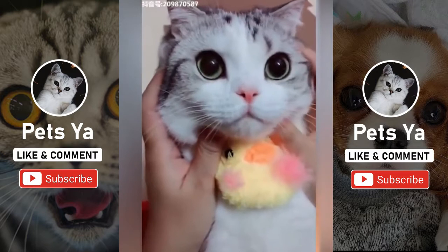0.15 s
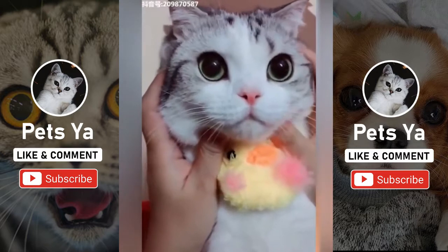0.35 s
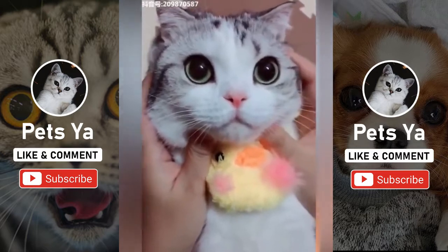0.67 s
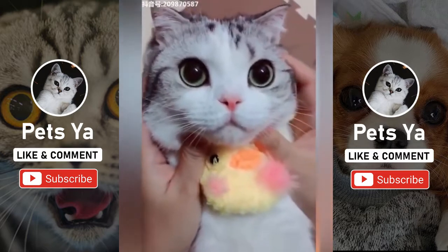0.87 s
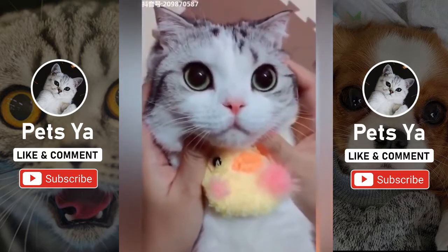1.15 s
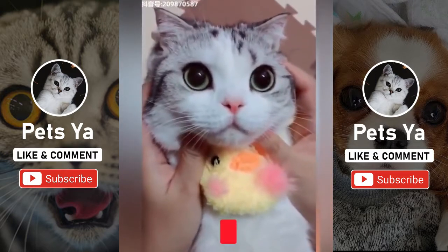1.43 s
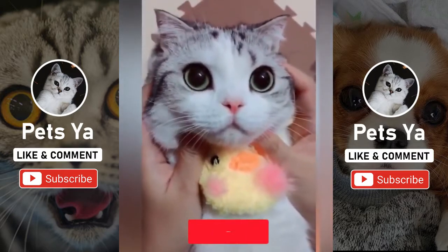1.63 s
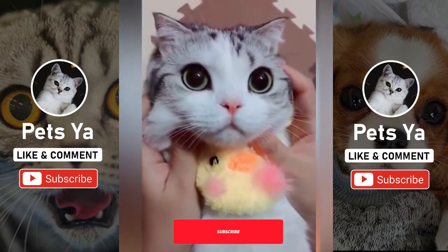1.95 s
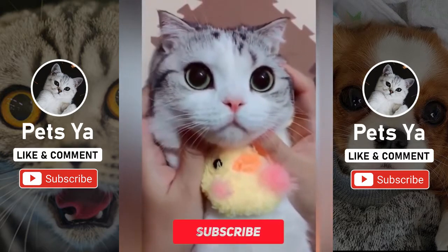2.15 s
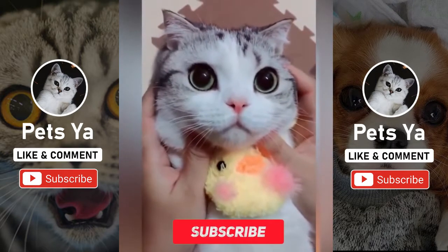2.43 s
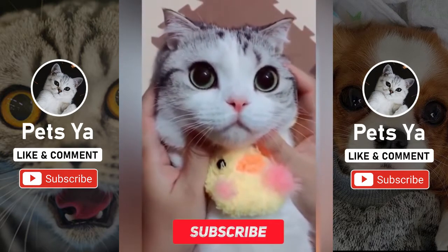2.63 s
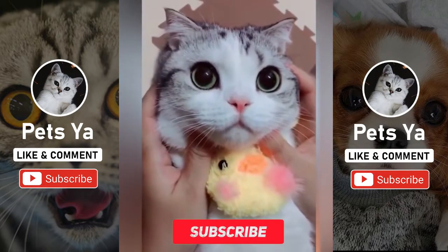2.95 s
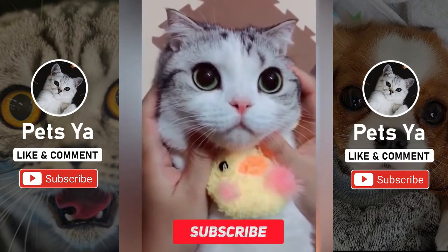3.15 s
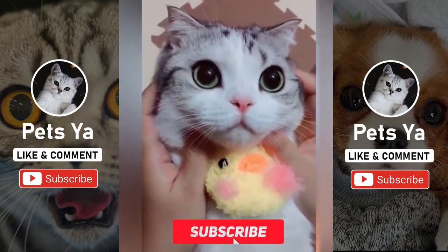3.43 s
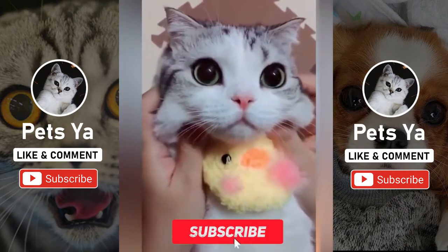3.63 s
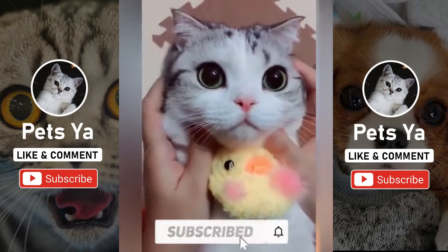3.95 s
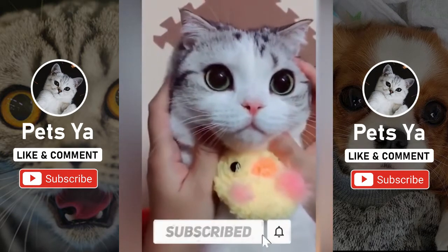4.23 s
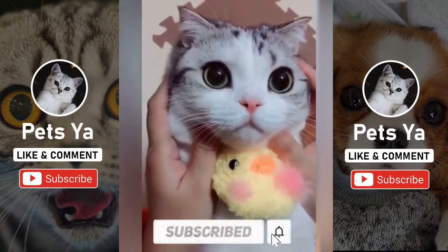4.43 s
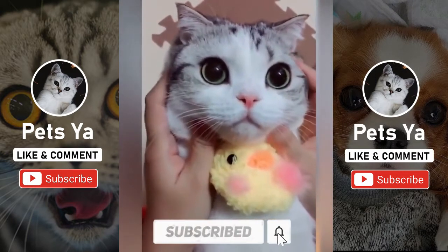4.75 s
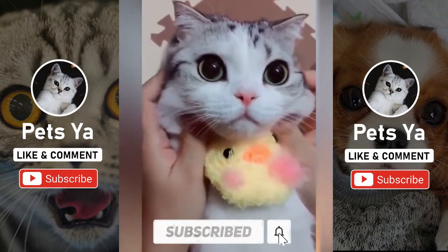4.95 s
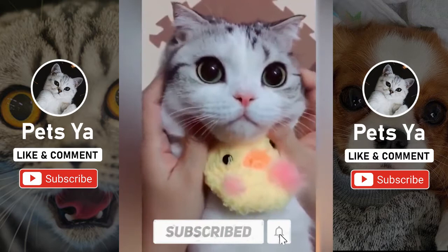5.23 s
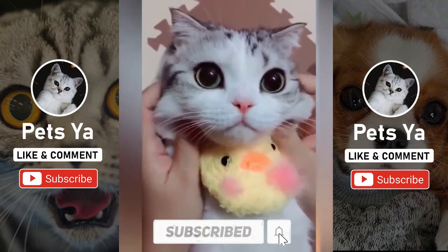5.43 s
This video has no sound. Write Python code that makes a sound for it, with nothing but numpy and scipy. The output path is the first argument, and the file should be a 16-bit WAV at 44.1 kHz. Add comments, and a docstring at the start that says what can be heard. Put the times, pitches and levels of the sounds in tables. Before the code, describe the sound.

A plush toy gives five short, high squeezed squeaks, with faint rubbing of hands on fur in a quiet room.

```python
"""A plush toy is squeezed five times against a kitten, close to a phone in a small quiet room.
At 0 s a plastic reed squeaks in an arch as air is pressed out, then again as it is sucked back.
Hands bump and rub on fur and plush, the plastic ticks, and a second squeeze follows at 2.2 s.
At 4 s comes a third, with two reeds on the intake; then more stroking.
Two quick squeezes at 5.1 and 5.4 s close the scene, the last drawing air through three reeds at once."""
import sys
import numpy as np
from scipy import signal
from scipy.fft import rfft, irfft, next_fast_len
from scipy.io import wavfile
from scipy.ndimage import uniform_filter1d, minimum_filter1d, map_coordinates

SR = 44100
rng = np.random.default_rng(int(sys.argv[2]) if len(sys.argv) > 2 else 0)


def persist_wave(psi):
    """Save psi, clipped to +-1, as 16-bit WAV."""
    counts = np.round(np.clip(psi, -1, 1) * 32767).astype(np.int16)
    wavfile.write(sys.argv[1], SR, np.atleast_2d(counts).T)


N = 246544

# Reed and pipe colours, one for each way of blowing: freq_hz, gain_db
MUFFLED = [(600, -29.5), (1150, -17), (2300, -13), (3500, -6), (4900, -0.5), (6000, -7), (7700, -6.5),
           (8700, -21), (9800, -39), (11700, -25), (13500, -44)]
BRIGHT = [(600, -26), (1450, -11), (2900, -5), (4500, -3.5), (5500, -6), (6600, -16.5), (8000, -9.5),
          (9700, -4), (10400, -11), (11000, -16.5), (12600, -23), (14000, -32), (15500, -48)]
RINGING = [(600, -30.5), (1400, -6.5), (2820, -2.5), (4230, 0), (5600, 0), (7050, -8.5), (8400, -14),
           (9500, -3.5), (10000, 0.5), (11280, -15), (12600, -28), (14100, -24.5), (15500, -34)]
HARD = [(600, -27.5), (1500, -15), (3100, -5.5), (4200, -6.5), (5400, 0), (6600, -10.5), (8300, -14.5),
        (10000, -16.5), (12000, -30.5), (15500, -46.5)]
SHRILL = [(600, -23), (1450, -9.5), (2900, -5), (4400, -1), (5900, -19), (7400, -26.5), (8900, -14),
          (10300, -10), (11300, -5), (12000, -31), (13200, -21), (14300, -31), (15500, -40.5)]
INWARD = [(600, -13.5), (1280, -9.5), (2600, -5), (3900, -3), (5100, -9.5), (6300, -18), (7500, -33),
          (8900, -14), (10200, -10.5), (11300, -11), (12700, -17.5), (14200, -37), (15500, -28.5)]
MELLOW = [(600, -23), (1150, -4.5), (2300, -2), (3450, 4), (4600, -20.5), (5800, -29.5), (7500, -37.5),
          (9300, -27), (10800, -23), (12500, -30.5), (15500, -42)]
HOLLOW = [(600, -16), (1150, 1), (2350, 5), (3500, 6.5), (4700, -3), (7500, -39), (10500, -16),
          (15500, -42)]
# Air leaking through a reed: freq_hz, density_db
LEAK = [(300, -27.5), (950, -20.5), (1300, 0), (1700, -14), (2400, -8.5), (3300, -2), (5200, -0.5),
        (7000, -3.5), (8500, -7), (10500, -12.5), (12500, -17.5), (15500, -31.5)]
# Turbulent air in a reed: freq_hz, density_db
TURBULENCE = [(200, -24), (700, -13.5), (1400, -11.5), (3000, -10), (5000, -12.5), (7000, -3.5),
              (8700, -3.5), (10500, -9), (13000, -6), (15500, -19.5)]
# Plastic tick or fabric scratch: freq_hz, gain_db
TICK = [(300, -19), (1500, -6), (2700, -7.5), (3900, -1.5), (5200, -15), (8000, -27.5), (15000, -33.5)]


def amp(db):
    """Decibels to gain."""
    return 10 ** (np.asarray(db) / 20)


def unit(x):
    """Scale to rms 1."""
    return x / np.sqrt(np.mean(x ** 2) + 1e-20)


def along(points, hz):
    """Interpolate (freq_hz, value) points on a log axis."""
    freq_hz, values = np.transpose(points)
    return np.interp(np.log(hz + 1), np.log(freq_hz), values)


def wobble(rate_hz, size):
    """Smooth random curve, rate_hz knots a second."""
    knots = rng.standard_normal(int(size * rate_hz / SR) + 4)
    return map_coordinates(knots, [np.arange(size) * rate_hz / SR])


def coloured(x, points, size=4096):
    """Minimum-phase filter through (freq_hz, gain_db) points."""
    cepstrum = irfft(np.log(amp(along(points, np.fft.rfftfreq(size, 1 / SR)))))
    fold = 1 + np.sign(size / 2 - np.arange(size))
    fold[0] = 1
    return signal.fftconvolve(x, irfft(np.exp(rfft(cepstrum * fold))))[:len(x)]


def noise(points):
    """Noise of rms 1 with the given spectrum."""
    shape = amp(along(points, np.fft.rfftfreq(N, 1 / SR)))
    return unit(irfft(rfft(rng.standard_normal(N)) * shape, N))


def add(track, start_s, x):
    """Mix x into the track at start_s."""
    start = min(round(start_s * SR), N)
    x = x[max(-start, 0):N - start]
    track[max(start, 0):max(start, 0) + len(x)] += x


def rumble(level_db=-62.5):
    """Faint, wavering low noise."""
    # Rumble spectrum: freq_hz, density_db
    spectrum = [(8.8, -34), (15, 1), (102, -2.5), (145, -10.5), (196, -6), (219, -17), (300, -14),
                (390, -45.5), (660, -120)]
    return amp(level_db + 2.0 * wobble(1.8, N) + 3.0 * wobble(24, N)) * noise(spectrum)


def room(x, early_db=-27, tail_db=-29, early_t60_s=.13):
    """Near surfaces answer at once; the tail dies fastest in the treble."""
    # Room decay: freq_hz, t60_s
    decay = [(300, .28), (1300, 0.35), (4000, 0.3), (8000, 0.19), (15000, 0.057)]
    hz, t, spectra = signal.stft(rng.standard_normal(SR // 2), SR, nperseg=256)
    tail = signal.istft(spectra * amp(-60 * t / along(decay, hz)[:, None]), SR, nperseg=256)[1]
    early = rng.standard_normal(len(tail)) * amp(-60 * np.arange(len(tail)) / SR / early_t60_s)
    response = amp(tail_db) * tail / np.linalg.norm(tail) + amp(early_db) * early / np.linalg.norm(early)
    return signal.fftconvolve(x, np.pad(response, (SR // 300, 0)))[:N]


def handling(rub_gain_db=-0.5, hold_db=-67, fur_db=-71):
    """Fingers rub the plush and catch on its pile; the hands never quite rest, so the fur hisses on."""
    # Finger strokes: centre_s, half_length_s, rub_db, pile_db
    strokes = [(1.442, 0.098, -64, -54), (1.543, 0.12, -57, -72), (2.511, .18, -53, -79.5),
               (4.762, 0.16, -47.5, -58.5), (5.028, 0.11, -48, -62.5)]
    # Dull rubbing: freq_hz, density_db
    rub = [(35, -42), (60, -19.5), (113, 1), (151, -1.5), (284, -4.5), (526, -13), (656, -23.5),
           (1700, -43.5), (2000, -38), (2600, -66.5), (4400, -120)]
    # Catching on the pile: freq_hz, density_db
    pile = [(100, -23.5), (250, 4.5), (480, -6.5), (750, -7), (1200, -42.5), (3000, -35.5), (8000, -58.5)]
    # Fur hiss: freq_hz, density_db
    fur = [(350, -32), (600, -8.5), (660, -14), (832, -13), (915, -10.5), (1660, -20.5), (3470, -22.5),
           (10700, -40.5), (15500, -60)]
    t = np.arange(N) / SR
    centre_s, half_length_s, rub_db, pile_db = np.transpose(strokes)
    force = np.exp(-((t - centre_s[:, None]) / half_length_s[:, None]) ** 2)
    rubbing = (amp(hold_db) + amp(rub_db) @ force) * amp(rub_gain_db + 1.6 * wobble(32, N)) * noise(rub)
    catching = amp(pile_db) @ force * amp(3.2 * wobble(50, N)) * noise(pile)
    unsteady_db = 1.1 * wobble(25, N) + .8 * wobble(2, N)
    return rubbing + catching + amp(fur_db + unsteady_db) * noise(fur)


def bumps(floor_hz=52, scratch_db=-25):
    """Soft hand bumps fall in pitch, each with a scratch of fabric."""
    # Bumps: start_s, level_db, sweep_hz, glide_s, length_s
    hits = [(0.622, -42.5, 1170, 0.0054, 0.032), (0.693, -40, 550, 0.0046, 0.037),
            (5.275, -41, 213, 0.0087, 0.029)]
    out = np.zeros(N)
    for start_s, level_db, sweep_hz, glide_s, length_s in hits:
        t = np.arange(0, length_s, 1 / SR)
        hz = floor_hz + sweep_hz * np.exp(-t / glide_s)
        thud = np.sin(2 * np.pi * np.cumsum(hz) / SR)
        scratch = amp(scratch_db) * unit(coloured(rng.standard_normal(len(t)), TICK))
        envelope = np.sqrt(np.abs(np.sin(np.pi * t / length_s)))
        add(out, start_s, amp(level_db) * envelope * (thud + scratch))
    return out


def clicks(rows, colour, t60_s, gain_db):
    """Plastic cracks: one short noise burst a row."""
    out, t = np.zeros(N), np.arange(SR // 20) / SR
    for start_s, level_db in rows:
        crack = coloured(rng.standard_normal(len(t)) * amp(-60 * t / t60_s), colour)
        add(out, start_s, amp(level_db + gain_db) * crack / np.abs(crack).max())
    return out


def plastic_ticks():
    """The toy's plastic ticks between squeezes."""
    # Ticks: start_s, relative_db
    ticks = [(0.7906, -42), (0.9175, -43.5), (0.965, -37), (1.9294, -52.5), (3.1168, -45), (3.8889, -33),
             (3.9585, -40.5)]
    return clicks(ticks, TICK, t60_s=0.01038, gain_db=-12)


def leak(times_s, level_db, rise_s, decay_s):
    """Air hisses through a reed as it starts or stalls."""
    t = np.arange(N) / SR
    flow = sum(np.exp(-np.where(t < s, ((s - t) / rise_s) ** 2, (t - s) / decay_s)) for s in times_s)
    return amp(level_db) * flow * noise(LEAK)


def arch(length_s, rise_s, start_hz, crest_hz, end_hz, fall_power, crest_db, swell_db, fade_db):
    """Pressure climbs to a crest and gives way; pitch and level follow."""
    t = np.arange(0, length_s, 1 / SR)
    shortfall = np.clip(1 - t / rise_s, 0, 1) ** 1.7
    fall = np.clip((t - rise_s) / (length_s - rise_s), 0, 1)
    pitch_hz = crest_hz - (crest_hz - start_hz) * shortfall - (crest_hz - end_hz) * fall ** fall_power
    return t, pitch_hz, crest_db - swell_db * shortfall - fade_db * fall ** 2


def reed(curve, colour, jitter, hiss, air_db, attack_s, release_s, sag_per_s, rasp_db, flutter_db):
    """A reed chops air into one turbulent puff a cycle, coloured by its pipe. Returns offset_s, sound."""
    # Side note colour: freq_hz, gain_db
    side_colour = [(600, -26.5), (2200, -0.5), (4400, -15.5), (15500, -45)]
    scoop, spread_rad = .08, 0.39
    closing_db, shimmer_db, flicker_db = -27, 0.61, 3.6
    pipe_hz, undertone_db = 3905, -41
    split_hz, split_width_hz, split_ratio, split_db = 1680, 50, 1.24, -21.5
    times_s, pitch_hz, level_db = curve
    t = np.arange(-attack_s, times_s[-1] + 4 * release_s, 1 / SR)
    stalled_s = np.maximum(t - times_s[-1], 0)
    flow = amp(np.interp(t, times_s, level_db) + flutter_db * wobble(73, len(t)))
    flow *= np.clip((t - t[0]) / attack_s, 0, 1) ** 2 * np.exp(-(stalled_s / release_s) ** 1.5)
    # Starts flat, sags as the pressure runs out.
    hz = uniform_filter1d(np.interp(t, times_s, pitch_hz), size=400) * np.exp(-sag_per_s * stalled_s)
    hz *= 1 - scoop * np.exp(-((t - t[0]) / attack_s) ** 2)
    hz *= 1 + jitter * wobble(600, len(t))
    phase = 2 * np.pi * np.cumsum(hz) / SR
    # Weak flow no longer closes the reed: overtones drop out.
    k = np.arange(1, 14)[:, None]
    closing = flow / (flow + amp(closing_db))
    drift = np.array([wobble(45, len(t)) + .5 * wobble(300, len(t)) for _ in k])
    harmonics = closing ** (k / 4) * amp(shimmer_db * k * drift) * (k * hz < SR / 2)
    puffs = coloured((harmonics * np.cos(k * phase - spread_rad * k ** 2)).sum(0), colour)
    tone = puffs / np.sqrt(np.abs(uniform_filter1d(puffs ** 2, size=200)) + 1e-9)
    opening = 1 + .7 * np.cos(phase)
    air = unit(coloured(rng.standard_normal(len(t)) * opening, hiss))
    rasp = unit(coloured(coloured(rng.standard_normal(len(t)) * opening, TURBULENCE), colour))
    rush = (amp(air_db) * air + amp(rasp_db) * rasp) * amp(flicker_db * wobble(37, len(t)))
    # Harmonic 3 beats against the pipe's own note.
    undertone = np.sin(3 * phase - 2 * np.pi * pipe_hz * t) * np.clip((3 * hz - pipe_hz) / 500, 0, 1)
    # Blown hardest, the tone splits off a side note.
    split = (1 + np.tanh((hz - split_hz) / split_width_hz)) / 2
    side_phase = split_ratio * phase
    side = split * unit(coloured(np.sin(side_phase) + np.sin(2 * side_phase), side_colour))
    return t[0], flow * (tone + rush + amp(undertone_db) * undertone + amp(split_db) * side)


def squeaks(rows, hiss, snap_db, snap_lead_s=0.00063, **blowing):
    """Each reed snaps into motion, then follows its arch of pressure."""
    out, snaps = np.zeros(N), []
    for start_s, *shape, colour, jitter, air_db in rows:
        times_s, pitch_hz, level_db = arch(*shape)
        offset_s, sound = reed((times_s, pitch_hz, level_db), colour, jitter, hiss, air_db, **blowing)
        add(out, start_s + offset_s, sound)
        snaps.append((start_s - snap_lead_s, level_db[0]))
    return out + clicks(snaps, HARD, t60_s=0.006, gain_db=snap_db)


def drawing():
    """The toy refills: a faint hiss, then squeaks that droop as they die."""
    # Air in, one row a reed: start_s, length_s, rise_s, start_hz, crest_hz, end_hz, fall_power,
    # crest_db, swell_db, fade_db, colour, jitter_ratio, air_db
    draws = [ (.11, 0.12, 0.037, 1430, 1492, 1351, 1.6, -10, 1.5, 7.4, SHRILL, .0007, -28.5),
             (2.34, 0.17, 0.042, 1264, 1268, 1182, 1.4, -16, 0.41, 6.3, INWARD, 0.00048, -31),
             (4.164, .103, 0.027, 1125, 1186, 1074, 1.1, -14, 9.2, 4.2, MELLOW, 0.0017, -28),
             (4.2447, .055, 0.023, 1282, 1262, 1194, 1.2, -14, .5, 4.1, INWARD, .001, -22.5),
             (5.242, .109, 0.038, 1104, 1212, 1084, .87, -17.5, 6.7, 6.3, HOLLOW, .0015, -30),
             (5.274, 0.084, 0.035, 1251, 1272, 1263, 6.2, -16, 3.5, 0.44, INWARD, .0012, -26.5),
             (5.5, .09, 0.039, 1162, 1199, 1067, 5.3, -26, 6, .3, HOLLOW, 0.0017, -87),
             (5.524, 0.058, 0.018, 1281, 1311, 1338, 1.52, -16.5, 1.2, 2.3, INWARD, .001, -30.5),
             (5.522, .066, 0.0055, 1407, 1419, 1349, 2.2, -19, 0.36, 15, SHRILL, 0.0021, -24), ]
    starts_s = [start_s for start_s, *_ in draws]
    tones = squeaks(draws, TURBULENCE, snap_db=-5.5, attack_s=0.0056, release_s=.012,
                    sag_per_s=6.6, rasp_db=-41.5, flutter_db=0.13)
    return tones + leak(starts_s, level_db=-41.5, rise_s=0.031, decay_s=0.0075)


def pressing():
    """Pressed hard, the reed rasps and stalls abruptly; the remaining air hisses out."""
    # Air out, one row a squeeze: start_s, length_s, rise_s, start_hz, crest_hz, end_hz, fall_power,
    # crest_db, swell_db, fade_db, colour, jitter_ratio, air_db
    presses = [ (-0.01, 0.075, 0.015, 1182, 1224, 984, 2, -12, 1.02, 9, MUFFLED, .0018, -24),
               (2.188, 0.097, .028, 1397, 1571, 1299, 1.8, -8, 3.5, 8, BRIGHT, 0.0023, -36),
               (4.038, .085, .028, 1391, 1426, 1322, 2.1, -11, 2.6, 2.1, RINGING, 0.00202, -30),
               (5.109, .1, .047, 1365, 1784, 1284, .9, -11, 3, 9.8, HARD, 0.0098, -14),
               (5.386, 0.11, .05, 1281, 1935, 1283, .93, -11.5, 2.2, 7.7, HARD, 0.0056, -18), ]
    stalls_s = [start_s + length_s for start_s, length_s, *_ in presses]
    tones = squeaks(presses, LEAK, snap_db=5.5, attack_s=0.0028, release_s=0.006,
                    sag_per_s=3.6, rasp_db=-25, flutter_db=2.08)
    return tones + leak(stalls_s, level_db=-26, rise_s=.008, decay_s=0.027)


def scene():
    """The toy in its room, over handling and rumble."""
    toy = pressing() + drawing() + plastic_ticks()
    return (rumble() + room(toy) + bumps() + handling() + toy)[None]


def gain_control(x, boost_db=5.5, knee_db=-36.5, recover_db_per_s=4):
    """Quiet passages are lifted; a loud sound cancels the lift, which creeps back."""
    power = np.abs(uniform_filter1d(x ** 2, size=300))
    loud = power ** 2 / (power ** 2 + amp(knee_db) ** 4)
    ramp_db = recover_db_per_s * np.arange(N) / SR
    cut_db = np.maximum.accumulate(boost_db * loud + ramp_db, axis=1) - ramp_db
    return x * amp(boost_db - cut_db)


def record(dry):
    """Phone: gain control, peak limiter, low-pass."""
    ceiling, top_hz, edge_hz = .88, 15800, 70
    ridden = gain_control(dry)
    needed_gain = ceiling / np.maximum(np.abs(ridden), ceiling)
    gain = uniform_filter1d(minimum_filter1d(needed_gain, size=260), size=200)
    size = next_fast_len(N + SR // 2)
    passband = (1 - np.tanh((np.fft.rfftfreq(size, 1 / SR) - top_hz) / edge_hz)) / 2
    return irfft(rfft(ridden * gain, size) * passband, size)[:, :N]


dry = scene()
out = record(dry)
persist_wave(out)
```